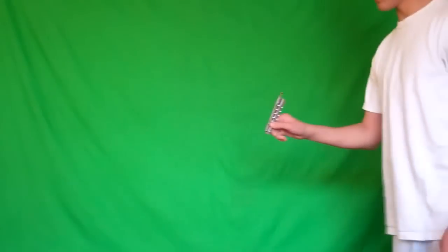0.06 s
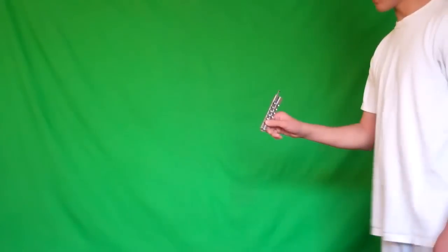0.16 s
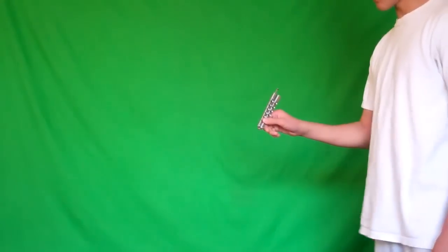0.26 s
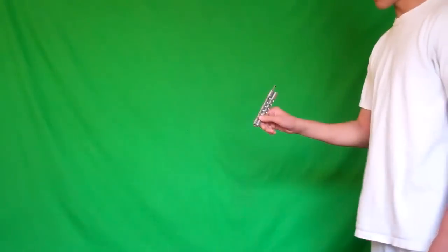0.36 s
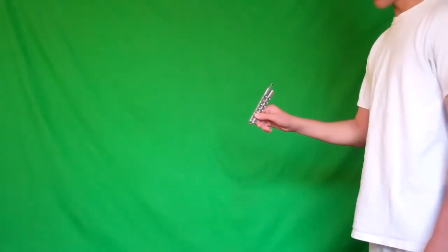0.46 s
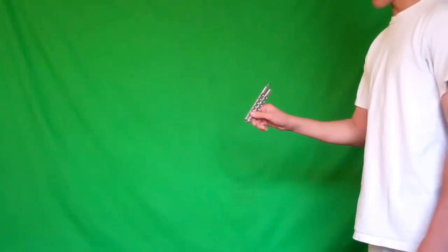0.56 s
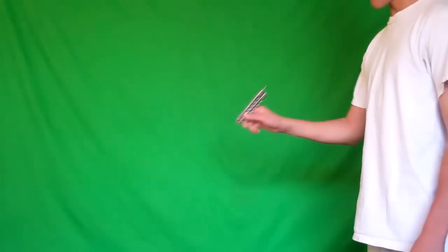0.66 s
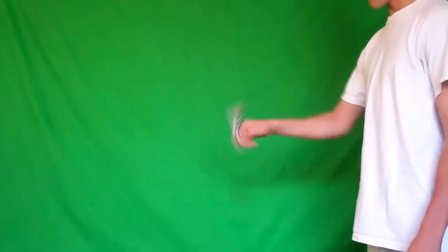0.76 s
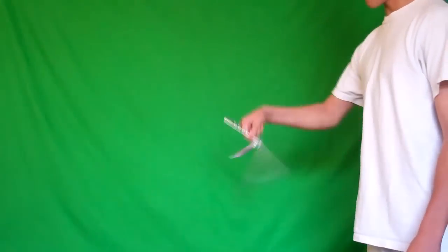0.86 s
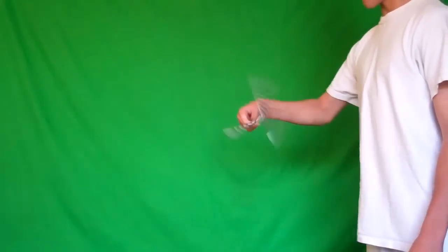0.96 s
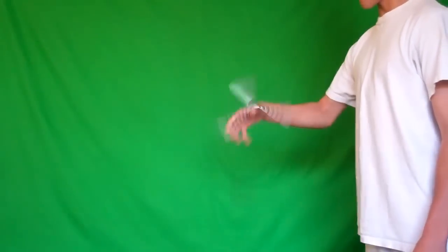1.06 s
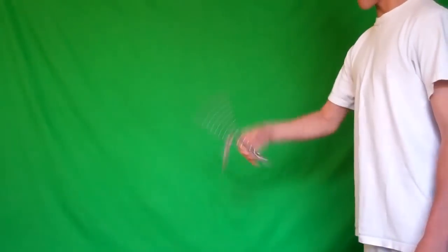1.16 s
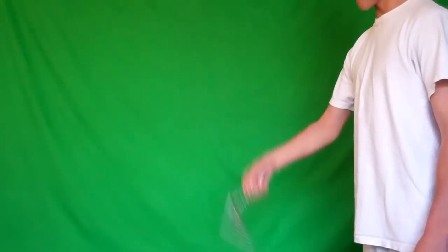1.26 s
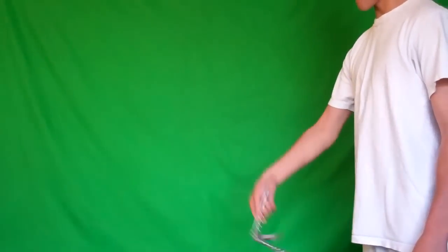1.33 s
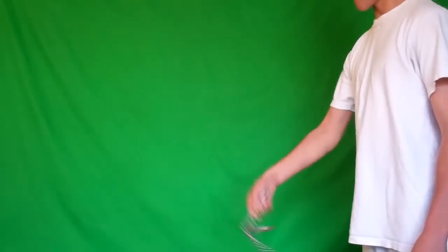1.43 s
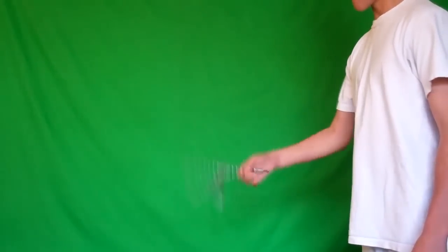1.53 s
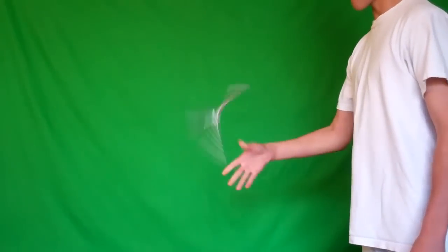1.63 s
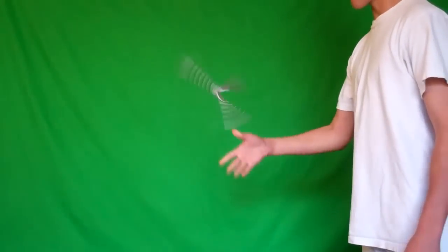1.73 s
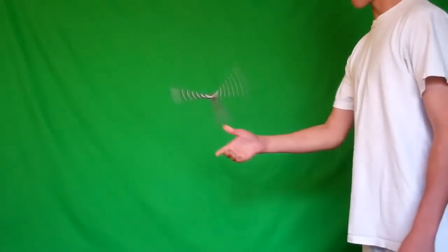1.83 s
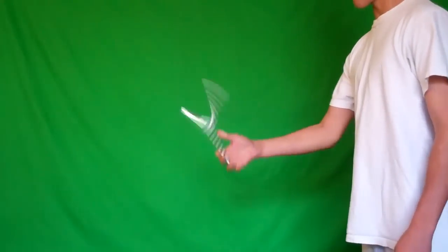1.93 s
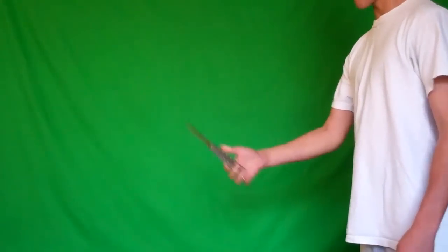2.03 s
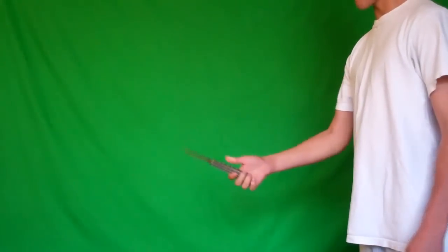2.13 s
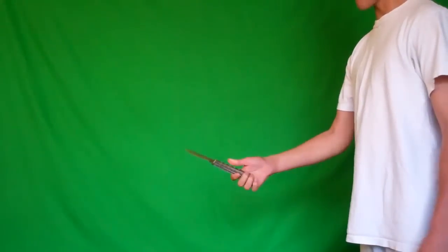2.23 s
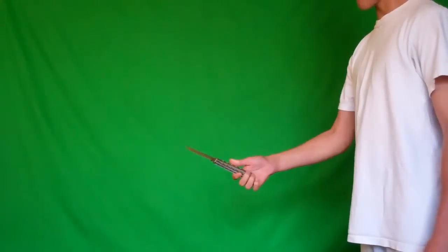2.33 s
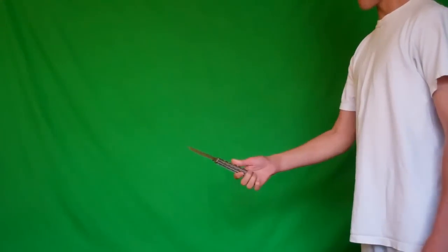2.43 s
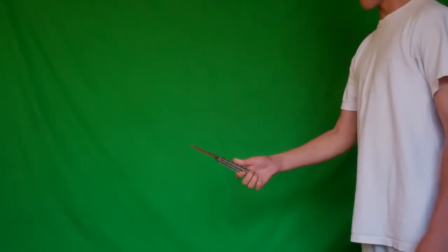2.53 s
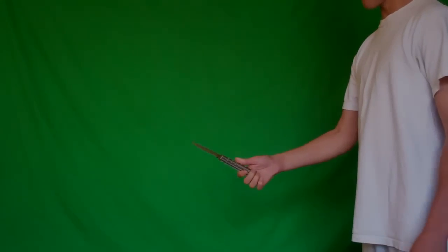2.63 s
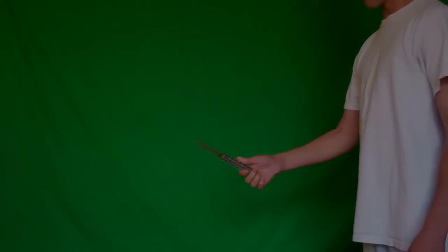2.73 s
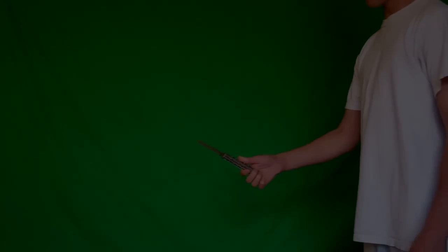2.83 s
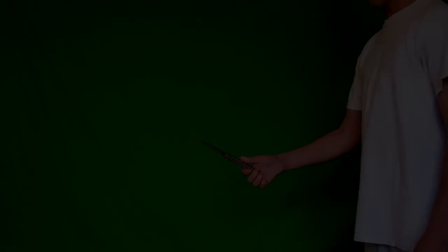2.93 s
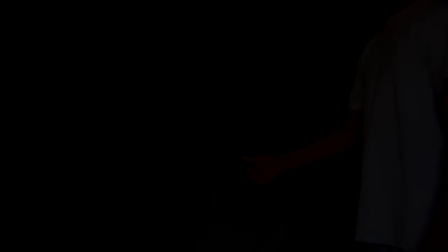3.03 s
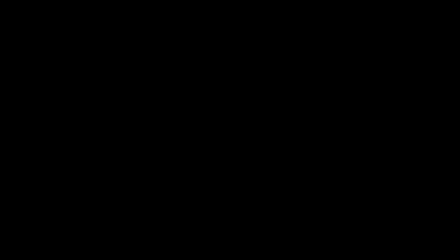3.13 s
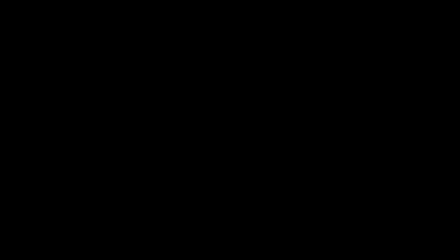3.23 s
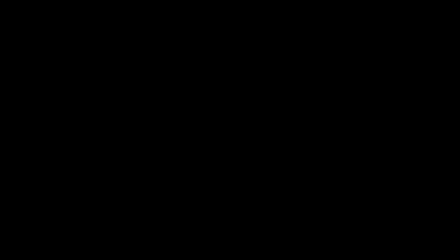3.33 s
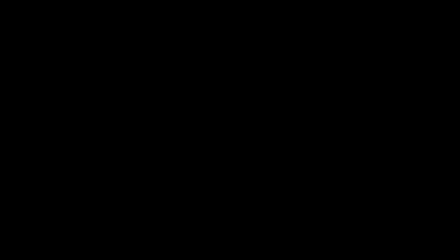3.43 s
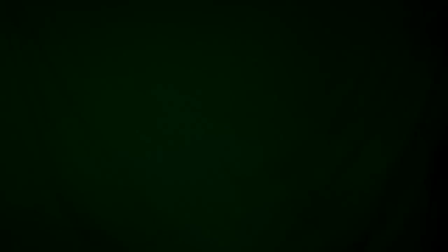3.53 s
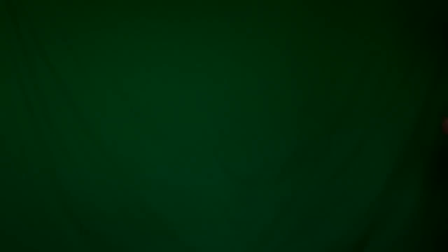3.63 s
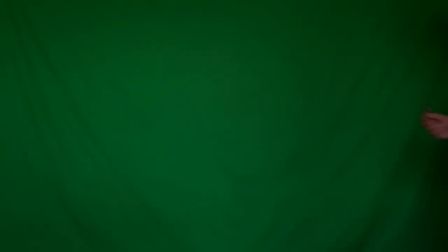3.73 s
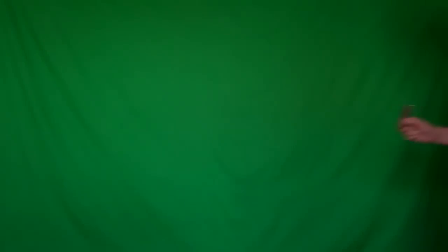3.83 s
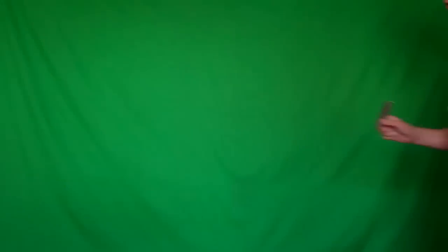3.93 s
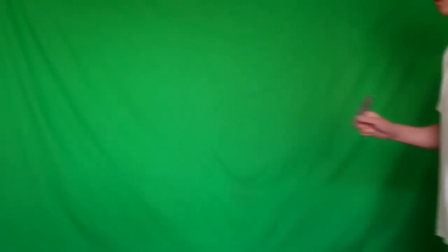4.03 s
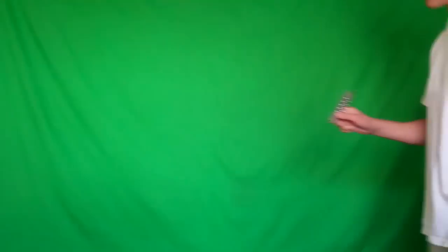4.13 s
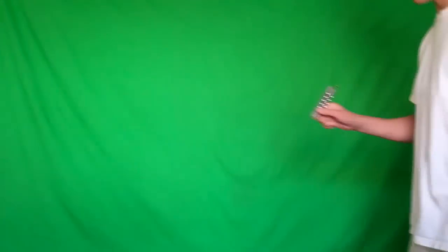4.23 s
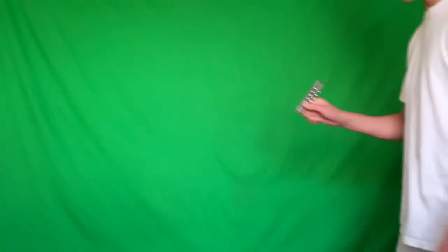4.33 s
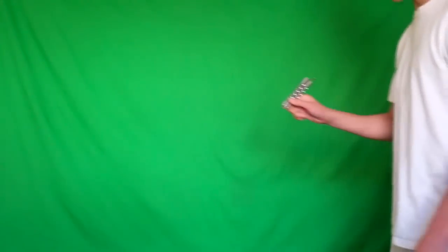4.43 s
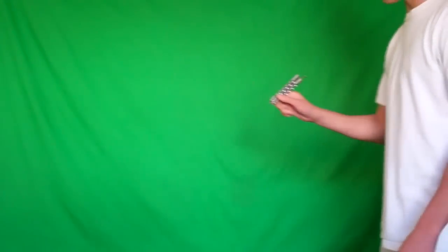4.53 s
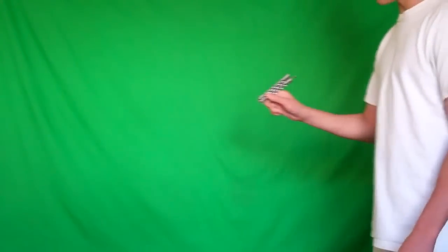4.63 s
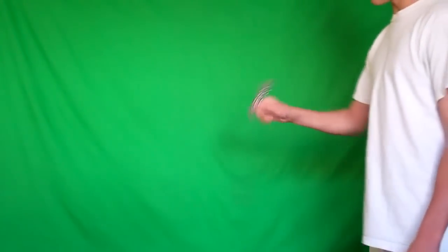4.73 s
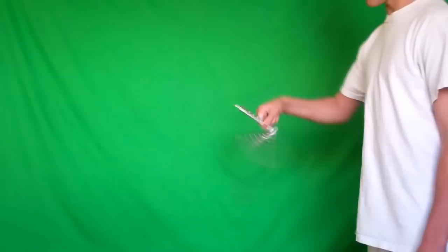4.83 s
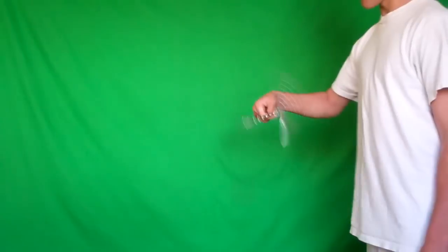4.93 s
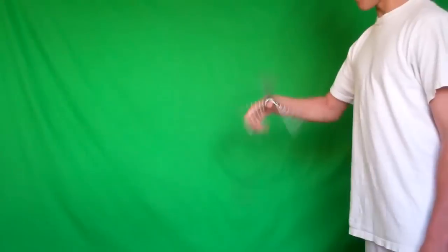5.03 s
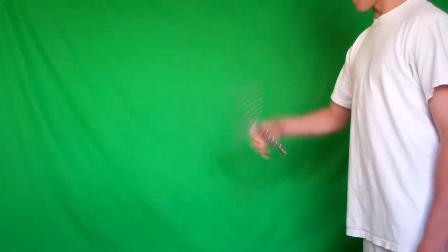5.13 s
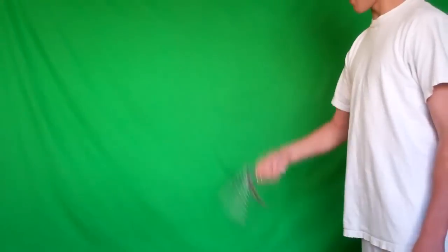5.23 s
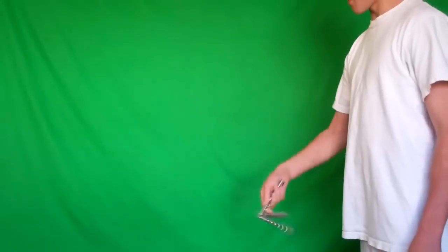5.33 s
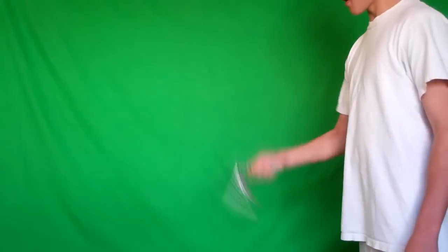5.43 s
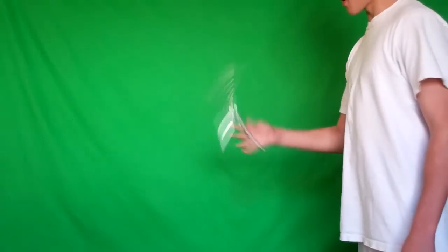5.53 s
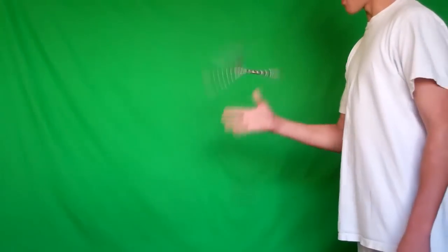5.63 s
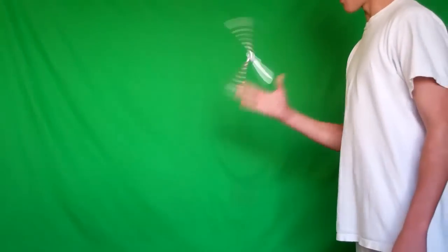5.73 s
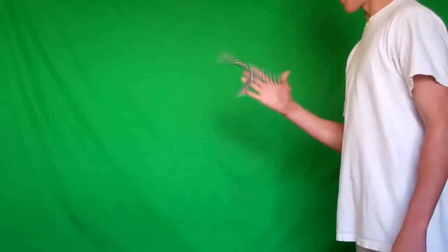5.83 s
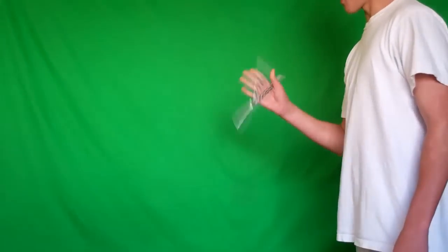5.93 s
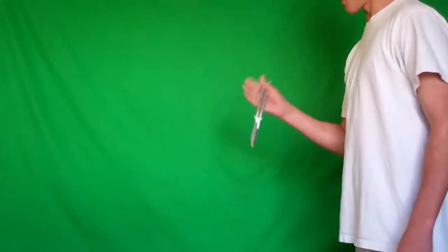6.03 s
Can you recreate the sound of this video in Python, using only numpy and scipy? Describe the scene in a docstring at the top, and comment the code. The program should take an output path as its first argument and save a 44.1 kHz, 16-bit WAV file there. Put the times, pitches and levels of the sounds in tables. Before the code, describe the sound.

Bright, thin metal clicks and clacks come in two flurries as someone twirls a butterfly knife indoors. Handles strike the blade and each other while the loose pivots rattle, and each trick ends with its hardest snaps. A gap of a few seconds separates them. The microphone picks up brief reflections from the walls, very soft clothing rustles and a low steady hiss.

```python
"""In a small room, a butterfly knife is flipped through two quick tricks with a pause between them.
Impacts of handle on blade and handle on handle excite the damped modes of the steel; the loose pivots
rattle, and each catch in the hand adds a dull knock. The walls return a short reverberation over soft
rustles, rumble, hiss, hum and a faint whine. An automatic gain control ducks after the hardest clashes,
and the level dips briefly in the pause."""
import sys
import numpy as np
from scipy import signal
from scipy.fft import rfft, irfft, next_fast_len
from scipy.io import wavfile
from scipy.ndimage import uniform_filter1d, minimum_filter1d

SR = 44100
rng = np.random.default_rng(int(sys.argv[2]) if len(sys.argv) > 2 else 0)


def file_out(sig):
    """Save sig as 16-bit WAV at sys.argv[1]."""
    # one column per channel
    cols = np.atleast_2d(sig).T
    # limit, then scale
    lim = np.clip(cols, -1, 1)
    pcm = np.round(lim * 32767).astype(np.int16)
    wavfile.write(sys.argv[1], SR, pcm)


N = 268172
CUTOFF_HZ = 14200

# Steel striking steel. Each row: start in seconds, level over the first 3 ms in dB, low-mode gain in dB,
# room send in dB, chatter decay time in seconds, favoured resonance in Hz, rebound delay in seconds,
# rebound level relative to the blow in dB.
IMPACTS = [(0.8647, -36.5, 2, 2, 0.00039, 9340, 0.0038, 0),
           (0.8884, -37, 6.5, -2.5, 0.0021, 6100, 0.0067, -6.5),
           (1.2112, -39, -1, -5, 0.00018, 12400, .007, -9), (1.242, -32, -1, -2.5, .0006, 1990, 0.0095, -8),
           (1.309, -37.5, -1, -3, 0.00016, 1990, .005, -15),
           (1.337, -25, -2, -1.5, 0.002, 10740, 0.0047, 2),
           (1.3524, -24, -14, -0.5, .0009, 4480, 0.0054, -12),
           (1.362, -25.5, 0, 1.5, 0.001, 4130, .005, -11),
           (1.6533, -40, 1.5, 2.5, 0.0031, 1780, 0.0053, -13),
           (1.685, -34, -2, -1, 0.00046, 13700, 0.0043, -14),
           (1.801, -46, 3.5, 5.5, 0.0019, 1910, .005, -3), (1.8231, -39, 1.5, 4, 0.0008, 2200, 0.0048, -11),
           (1.84, -34, -3.5, 0.5, 0.0019, 4160, 0.0058, -13),
           (1.8929, -38.5, 5, -0.5, 0.0015, 10800, 0.0044, -16),
           (1.9785, -23.5, -3, -0.5, 0.0018, 12260, 0.0024, 4),
           (2.0406, -16.5, -9.5, -2, .0009, 12200, 0.0024, -7.5),
           (2.0717, -12, -6.5, 2, 0.00042, 11300, .0063, -0.5),
           (2.0838, -14.5, -4, 8, 0.00073, 8360, .003, -5),
           (4.746, -26.5, -2.5, -1.5, 0.00068, 5800, 0.0041, -16),
           (4.812, -23, 3.5, -3.5, 0.00047, 11200, 0.0046, -7.5),
           (4.896, -26, -3, 1.5, 0.00063, 1760, .005, -12), (4.959, -41.5, 3, 5, 0.00086, 2270, 0.0039, -5),
           (5.2368, -24.5, 1.5, -0.5, 0.0039, 9070, .005, -15),
           (5.4482, -15, -4.5, -3.5, 0.0011, 2860, 0.0051, -11),
           (5.586, -43.5, 0, 3, 0.00072, 5800, .005, -8), (5.635, -25, -5, 4, 0.0012, 11200, .003, -3),
           (5.651, -23.5, -3.5, 3.5, 0.0004, 2940, 0.0037, -12),
           (5.812, -39.5, -4, 4.5, .0004, 13300, 0.0027, 0.5),
           (5.889, -19, -1.5, -2, 0.0015, 5550, 0.0074, -19),
           (5.8915, -15, -7, -5, 0.0013, 12200, 0.0055, -13),
           (6.024, -9.5, -2.5, 0.5, 0.0015, 7160, .0043, -10),
           (6.0434, -20.5, -1, 10.5, 0.0015, 2850, 0.0062, -4)]
# Modes of handles and blade, damped by the hand. Each row: frequency in Hz, relative energy in dB,
# time to decay by 60 dB in seconds.
STEEL_MODES = [(1080, -21.5, 0.034), (1890, -23, 0.015), (2735, -19, 0.0059), (3116, -12, 0.0202),
               (3635, -12.5, 0.023), (4095, -13.5, 0.0212), (4670, -14.5, 0.021), (5605, -3, 0.0091),
               (5580, -12.5, 0.021), (6210, -6.5, 0.0085), (7200, -18, 0.0074), (7880, -5.5, 0.025),
               (8550, -0.5, 0.034), (8770, -3.5, 0.041), (9090, -0.5, 0.042), (9800, -15, 0.0081),
               (10860, -1.5, 0.017), (11160, 3, 0.0096), (11320, 1, 0.022), (11320, 5, 0.041),
               (12250, -9, 0.0053), (12220, 5.5, 0.029), (13000, 7.5, 0.015), (13100, -11, 0.026),
               (13150, -7, 0.016), (13700, -7.5, 0.014)]
# Spectrum of the contact click. Each row: frequency in Hz, relative spectral density in dB.
CRACK_SPECTRUM = [(200, -34.5), (1000, -29), (2000, -20), (3200, -17.5), (7000, -12.5), (9500, -8.5),
                  (11500, -5), (14000, 0.5), (16000, -10.5)]
# Handles rattling as they swing. Each row: start in seconds, end in seconds, level in dB.
PIVOT_RATTLES = [(0.88, 0.894, -46), (1.146, 1.162, -55), (1.34, 1.369, -36), (1.462, 1.479, -48),
                 (1.689, 1.783, -52), (1.837, 1.85, -47.5), (1.987, 2.052, -38), (2.08, 2.124, -23),
                 (5.141, 5.151, -48), (5.191, 5.197, -48), (5.602, 5.689, -47.5), (5.739, 5.787, -46.5),
                 (5.917, 5.948, -29.5), (5.935, 5.969, -27), (5.98, 6.015, -30.5)]
# The knife stopping in the hand. Each row: start in seconds, level in dB.
HAND_CATCHES = [(1.9814, -47), (2.0838, -59), (4.812, -61), (5.4482, -51.5), (5.889, -40.5), (6.0241, -38)]
# Reverberation time. Each row: frequency in Hz, time to decay by 60 dB in seconds.
REVERB_TIMES = [(200, 0.22), (1000, 0.37), (3000, 0.32), (9000, 0.26), (14000, 0.21)]
# Initial spectrum of the reflections. Each row: frequency in Hz, relative level in dB.
REVERB_SPECTRUM = [(200, -29), (800, -3), (2000, 3), (5000, 4), (9000, 3), (14000, -2)]
# Coherence of the room's sound field. Each row: frequency in Hz, left-right correlation.
ROOM_COHERENCE = [(200, 1), (2000, 0.35), (6000, 0.07), (11000, 0.15), (14000, 0.24)]
# Sleeve, feet and swinging arm. Each row: peak time in seconds, Gaussian half width in seconds,
# centre frequency in Hz, level at the peak in dB.
BODY_RUSTLES = [(0.186, 0.039, 330, -61.5), (0.175, 0.031, 1010, -61), (1.827, 0.026, 1170, -63),
                (3.298, 0.0081, 860, -60.5), (3.61, 0.059, 450, -65), (4.57, .05, 380, -67.5),
                (5.037, 0.11, 890, -64), (5.829, 0.062, 770, -62)]
# Rumble and hiss. Each row: frequency in Hz, relative spectral density in dB. The end rows are skipped.
NOISE_SPECTRUM = [(15, -37), (25, -9.5), (52, -4.5), (76, -10), (119, -6.5), (147, -6), (318, -8.5),
                  (363, -8.5), (569, -10), (761, -11), (2030, -14.5), (8470, -15.5), (11900, -12.5),
                  (14000, -16)]
# Coherence of rumble and hiss. Each row: frequency in Hz, left-right correlation.
NOISE_COHERENCE = [(30, 1), (80, 0.51), (200, 0.15), (1000, 0.12), (14000, 0.019)]
# Mains hum and electronic whine. Each row: frequency in Hz, rms waver in Hz, level in dB.
ELECTRIC_TONES = [(116.4, 2.77, -75.5), (11860, 3.5, -75.5)]
# A brief dip in level. One row: centre in seconds, half width in seconds, gain at the centre in dB.
LEVEL_DIP = (3.327, 0.004, -10.5)


def clacks(crack_db=1.5, rebound_send_db=3.5, place_count=5):
    """Elastic impact: a handle strikes and rebounds. Returns direct sound and room sends by place."""
    direct, sends = np.zeros(N), np.zeros((place_count, N))
    for k, (s, level_db, low_db, send_db, chatter_s, ring_hz, gap_s, rebound_db) in enumerate(IMPACTS):
        strike = (s, level_db, send_db)
        # the handle has sprung away, so more of its rebound arrives by way of the room
        rebound = (s + gap_s, level_db + rebound_db, rebound_send_db)
        for start_s, touch_db, room_db in (strike, rebound):
            blow = signal.fftconvolve(steel_response(low_db, crack_db), contact_chatter(chatter_s))
            blow = from_db(touch_db) * unit_attack(favour_resonance(blow, ring_hz))
            add(direct, start_s, blow)
            add(sends[k % place_count], start_s, from_db(room_db) * blow)
    return direct, sends


def steel_response(low_db, crack_db, spread_db=3.0, grip_detune=0.05, split_hz=7000, size=3072):
    """Modal superposition: a crack plus damped sinusoids that vary with contact point and grip."""
    hz, mode_db, t60 = np.transpose(STEEL_MODES)[:, :, None]
    t = np.arange(size) / SR
    strength, detune, phase = rng.standard_normal((3, len(hz), 1))
    envelopes = from_db(mode_db + spread_db * strength - 60 * t / t60) / np.sqrt(t60)
    # the modes that the hand damps most are also the ones that it shifts most
    shifted_hz = hz * (1 + grip_detune * detune * t60.min() / t60)
    ring = np.sum(envelopes * np.sin(2 * np.pi * (shifted_hz * t + phase)), axis=0)
    touch = ring / np.linalg.norm(ring) + from_db(crack_db) * contact_crack(size)
    # blows near the middle of a handle favour its low bending modes
    low = signal.sosfilt(signal.butter(3, split_hz, "low", fs=SR, output="sos"), touch)
    high = signal.sosfilt(signal.butter(3, split_hz, "high", fs=SR, output="sos"), touch)
    return from_db(low_db) * low + high


def contact_crack(size):
    """Minimum phase: the shortest causal click with the contact's spectrum, at unit energy."""
    log_magnitude = np.log(from_db(at_hz(CRACK_SPECTRUM, bins(size))))
    cepstrum = irfft(log_magnitude, size)
    cepstrum[1:size // 2] *= 2
    cepstrum[size // 2 + 1:] = 0
    click = irfft(np.exp(rfft(cepstrum)), size)
    return click / np.linalg.norm(click)


def contact_chatter(decay_s, snap_db=-2.0, size=320):
    """Contact bounce: after a first snap, the hard faces chatter briefly before they part."""
    fade = np.exp(-np.arange(size) / SR / decay_s)
    burst = rng.standard_normal(size) * fade
    burst[0] = from_db(snap_db) * np.linalg.norm(burst)
    # many tiny impacts share the energy evenly across frequency
    flat_spectrum = np.exp(1j * np.angle(rfft(burst)))
    return irfft(flat_spectrum, size) * np.sqrt(fade)


def favour_resonance(sound, hz, boost_db=7.5, width_hz=450):
    """Selective excitation: the point of contact lifts one resonance above the rest."""
    b, a = signal.iirpeak(hz, hz / width_hz, fs=SR)
    return sound + (from_db(boost_db) - 1) * signal.lfilter(b, a, sound)


def rattles(ticks_per_s=220, uneven_db=4.5, joint_count=3):
    """Backlash: two loose pivots and the latch tick at random, and each tick rings the steel."""
    out = np.zeros(N)
    for start_s, end_s, level_db in PIVOT_RATTLES:
        length = max(int((end_s - start_s) * SR), 100)
        rattle = 0
        for _ in range(joint_count):
            hits = rng.random(SR // 4)[:length] < ticks_per_s / SR
            strength = rng.standard_normal(SR // 4)[:length]
            ticks = hits * np.sign(strength) * from_db(uneven_db * np.abs(strength))
            rattle = rattle + signal.fftconvolve(ticks, steel_response(low_db=0.0, crack_db=-3.5))
        swing_share = length / len(rattle)   # the ringing tail adds no energy to the swing's total
        add(out, start_s, from_db(level_db) * np.sqrt(swing_share) * unit_rms(rattle))
    return out


def catches(low_hz=300, high_hz=1150, size=1024):
    """Inelastic impact: the knife lands in the hand with a dull, band-limited knock."""
    out = np.zeros(N)
    knock = unit_attack(band(signal.unit_impulse(size), low_hz, high_hz))
    for s, level_db in HAND_CATCHES:
        add(out, s, from_db(level_db) * knock)
    return out


def microphone_ports(x, pan_db=0.35, phase_rad=0.58):
    """Level and phase cues: the knife lies a little to the left, so that port is louder and leads."""
    analytic = signal.hilbert(x, next_fast_len(N))[:N]
    shifted = np.exp(.5j * phase_rad * np.array([[1], [-1]])) * analytic
    return shifted.real * from_db([[pan_db], [-pan_db]])


def reverberation(x, wet_db=0.5, first_echo_s=0.00036, build_s=0.00043, size=16384):
    """Diffuse reflection: echoes gather quickly, then decay exponentially at each band's own rate."""
    t, hz = np.arange(size) / SR, bins(size)
    spectrum = rfft(stereo_noise(ROOM_COHERENCE, size))
    edges_hz = np.geomspace(100, SR / 2, 17)
    tail = 0
    for low, high in zip(edges_hz, edges_hz[1:]):
        centre_hz = np.sqrt(low * high)
        band_noise = irfft(spectrum * ((hz >= low) & (hz < high)), size)
        envelope_db = at_hz(REVERB_SPECTRUM, centre_hz) - 60 * t / at_hz(REVERB_TIMES, centre_hz)
        tail = tail + band_noise * from_db(envelope_db)
    build_up = 1 - np.exp(-np.maximum(t - first_echo_s, 0) / build_s)
    response = unit_rms(tail * build_up) / np.sqrt(size)
    return from_db(wet_db) * signal.fftconvolve(x[None], response, axes=1)[:, :N]


def rustles(edge_ratio=1.725):
    """Friction noise: cloth and feet make short, soft swells in low frequency bands."""
    t, out = np.arange(N) / SR, np.zeros((2, N))
    noise = stereo_noise(ROOM_COHERENCE, next_fast_len(N))[:, :N]
    for s, half_s, hz, level_db in BODY_RUSTLES:
        swell = np.exp(-((t - s) / half_s) ** 2 / 2)
        out += from_db(level_db) * swell * unit_rms(band(noise, hz / edge_ratio, hz * edge_ratio))
    return out


def background(noise_db=-57, pan_db=0.25, waver_s=0.042):
    """Noise floor: broadband room rumble and microphone hiss, with a wavering hum and whine."""
    size = next_fast_len(N)
    colour = from_db(at_hz(NOISE_SPECTRUM[1:-1], bins(size))) * (bins(size) < CUTOFF_HZ)
    noise = irfft(rfft(stereo_noise(NOISE_COHERENCE, size)) * colour, size)[:, :N]
    out = from_db(noise_db) * unit_rms(noise)
    for tone_hz, waver_hz, level_db in ELECTRIC_TONES:
        waver = unit_rms(uniform_filter1d(rng.standard_normal(N), int(waver_s * SR)))
        phase = 2 * np.pi * np.cumsum(tone_hz + waver_hz * waver) / SR
        out = out + from_db(level_db) * unit_rms(np.sin(phase))
    return out * from_db([[pan_db], [-pan_db]])


def gain_control(x, threshold_db=-20.5, steepness=7.1, depth_db=11.0, hold_s=0.18, release_db_per_s=55):
    """Compression: power above a threshold pulls the gain down; it holds, then creeps back."""
    power = smooth(np.mean(x ** 2, axis=0), time_constant_s=0.012)
    level_db = 10 * np.log10(power + 1e-12)
    cut_db = np.clip(steepness * (level_db - threshold_db), 0, depth_db)
    half_hold = int(hold_s * SR / 2)
    held_db = -minimum_filter1d(-cut_db, 2 * half_hold + 1, origin=half_hold, mode="constant")
    ramp_db = release_db_per_s * np.arange(N) / SR
    released_db = np.maximum.accumulate(held_db + ramp_db) - ramp_db
    return x * from_db(-smooth(released_db, time_constant_s=0.016))


def stereo_noise(coherence, size):
    """Partial coherence: mid and side noise mix to give the tabulated left-right correlation."""
    mid, side = rfft(rng.standard_normal((2, size)))
    correlation = np.clip(at_hz(coherence, bins(size)), -.99, .99)
    spectrum = np.sqrt(1 + correlation) * mid + np.sqrt(1 - correlation) * side * [[1], [-1]]
    return irfft(spectrum / np.sqrt(2), size)


def from_db(db):
    """Decibels to amplitude ratio."""
    return 10 ** (np.asarray(db) / 20)


def unit_rms(x):
    """Scale to rms 1."""
    return x / np.sqrt(np.mean(x ** 2) + 1e-20)


def unit_attack(sound):
    """Scale to rms 1 over the first 3 ms."""
    return sound / np.sqrt(np.mean(sound[:int(.003 * SR)] ** 2))


def at_hz(points, hz):
    """Interpolate a table on a log-frequency axis."""
    table_hz, value = np.transpose(points)
    return np.interp(np.log(np.maximum(hz, 1)), np.log(table_hz), value)


def bins(size):
    """Frequencies of a real spectrum in Hz."""
    return np.arange(size // 2 + 1) * SR / size


def band(x, low_hz, high_hz):
    """Band-pass with second-order slopes."""
    edges_hz = [low_hz, min(high_hz, .49 * SR)]
    return signal.sosfilt(signal.butter(2, edges_hz, "band", fs=SR, output="sos"), x)


def smooth(x, time_constant_s):
    """Exponential averaging by a one-pole low-pass."""
    pole = np.exp(-1 / (time_constant_s * SR))
    return signal.lfilter([1 - pole], [1, -pole], x)


def add(track, s, sound):
    """Mix a sound in at s seconds."""
    start = int(s * SR)
    part = sound[:N - start]
    track[start:start + len(part)] += part


def scene():
    """Superposition: the knife, its reflections, the moving body and the background add linearly."""
    direct, sends = clacks()
    handling = rattles() + catches()
    # each place along the knife's path has its own pattern of echoes
    reflections = sum(reverberation(x) for x in [*sends, handling])
    return microphone_ports(direct + handling) + reflections + rustles() + background()


def record(dry):
    """Gain control and band limiting: the level ducks and dips briefly, then the top treble is cut."""
    dip_s, half_s, dip_db = LEVEL_DIP
    t = np.arange(N) / SR
    dip = from_db(dip_db * np.exp(-((t - dip_s) / half_s) ** 2))
    low_pass = signal.ellip(10, .3, 70, CUTOFF_HZ, fs=SR, output="sos")
    return signal.sosfilt(low_pass, gain_control(dry) * dip)


dry = scene()
out = record(dry)
file_out(out)
```